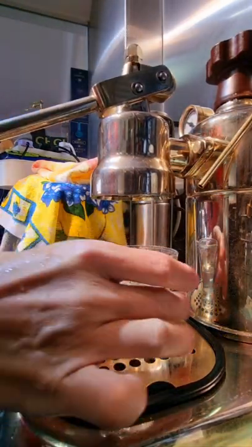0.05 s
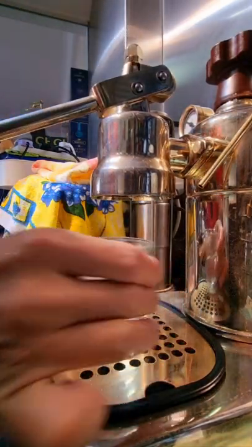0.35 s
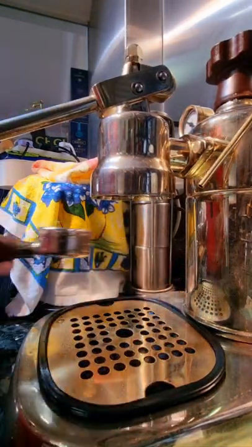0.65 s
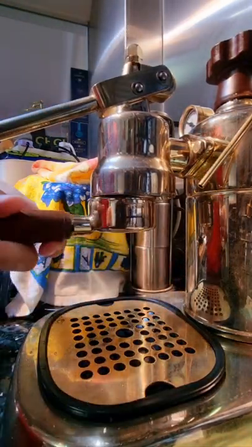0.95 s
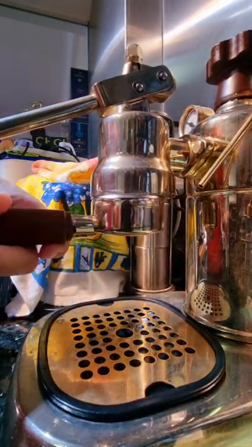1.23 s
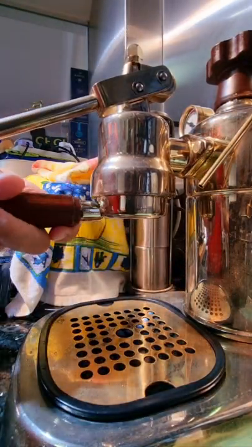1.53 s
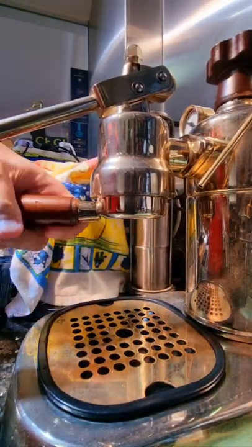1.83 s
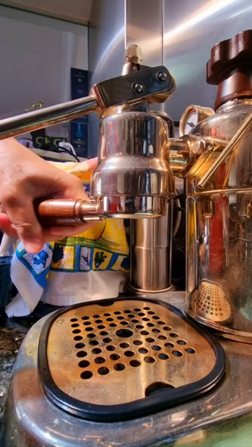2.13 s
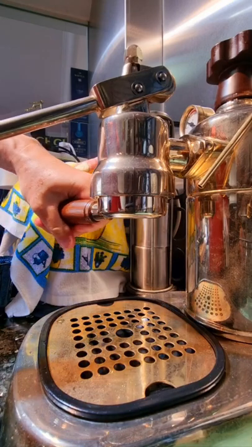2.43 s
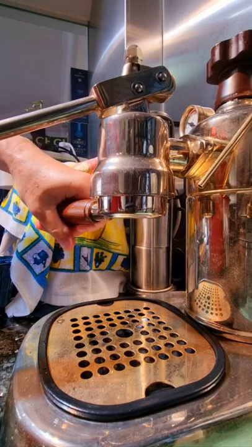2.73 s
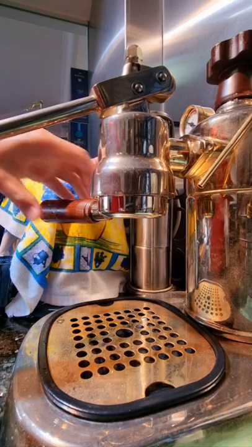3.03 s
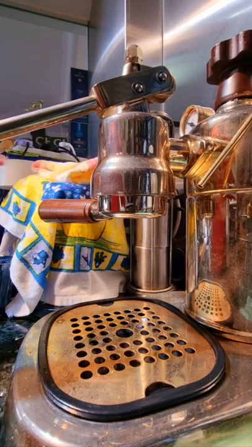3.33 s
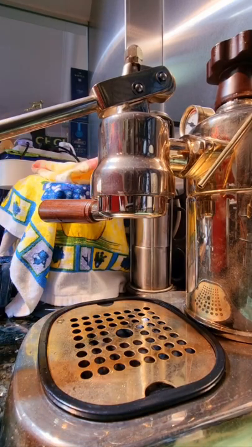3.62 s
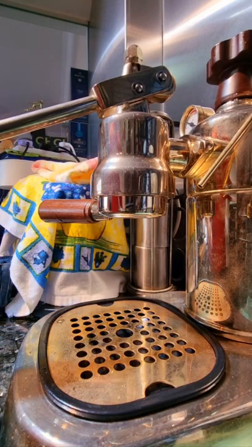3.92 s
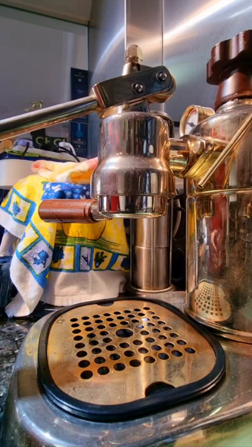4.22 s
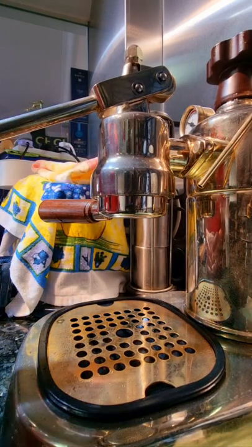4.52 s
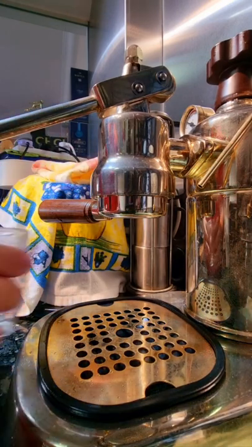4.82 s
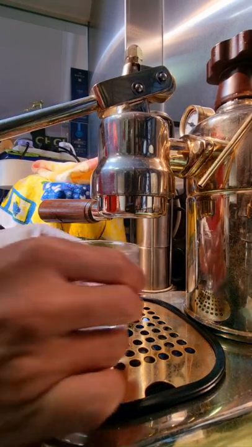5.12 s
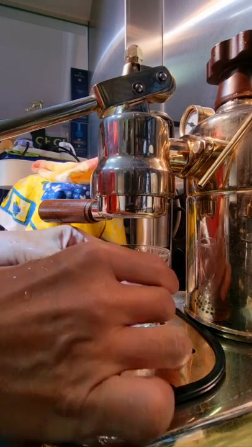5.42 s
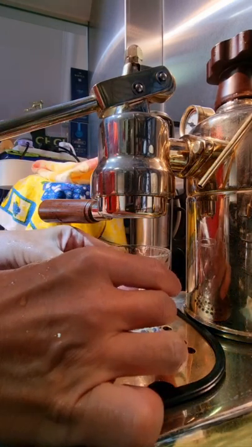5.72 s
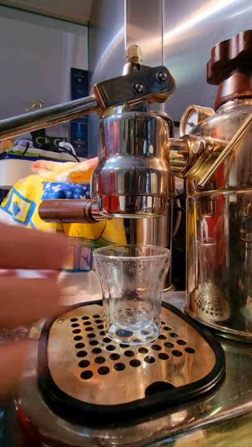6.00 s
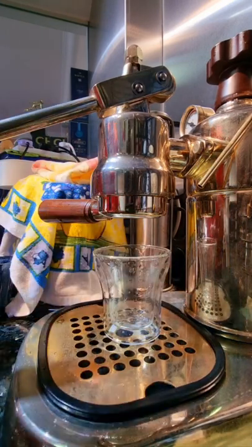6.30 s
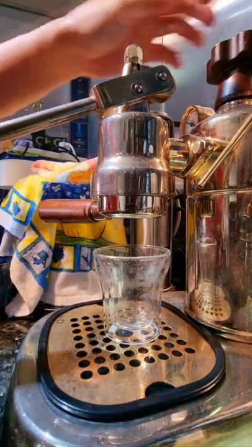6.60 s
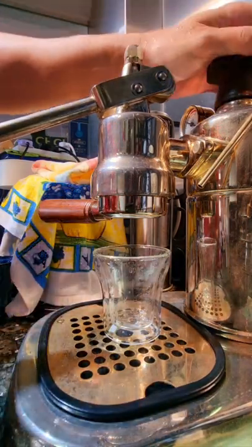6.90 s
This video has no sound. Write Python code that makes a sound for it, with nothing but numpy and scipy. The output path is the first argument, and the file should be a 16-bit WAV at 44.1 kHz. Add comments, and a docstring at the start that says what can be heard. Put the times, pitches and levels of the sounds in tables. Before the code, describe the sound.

Close by, a metal filter holder knocks against an espresso machine, slides into its groove with a short scrape and clacks home. After faint rubbery rubbing come some dull thuds and bright ticks, then a pause. Light clinks lead into a small glass landing on the metal drip tray in two quick rattles, followed by a soft knock and scattered little pings. A low kitchen hum and a barely audible boiler whistle lie underneath.

```python
"""Lever espresso machine and glass

A brass filter holder clacks into the group, scrapes round and is twisted tight on its rubber gasket.
Then a small glass rattles down on the metal drip tray, among light pings, faint ticks and low thuds.
Behind it all, a quiet kitchen hums and the hot boiler gives a thin whistle."""
import sys
import numpy as np
from scipy import signal
from scipy.fft import rfft, irfft
from scipy.io import wavfile

SR = 44100
rng = np.random.default_rng(int(sys.argv[2]) if len(sys.argv) > 2 else 0)


def wrap_up_sound(samples):
    """Save the sound to the file named by the first command line argument, as 16-bit audio."""
    columns = np.atleast_2d(samples).T
    # keep every value between -1 and 1, then stretch to whole-number steps
    tamed = np.clip(columns, -1, 1)
    steps = np.round(tamed * 32767).astype(np.int16)
    wavfile.write(sys.argv[1], SR, steps)


N = 306495
HIT_SIZE = 2 ** 14   # samples in one hit
CLACK_FALL_S, THUD_RISE_S = 0.0115, 0.012
PING_RISE_S, PING_FALL_S = 0.0055, 0.0081

# a faint, dull knock, then the holder's clacks:
# start_s, level_db, rise_s, tilt_db_per_octave, seated (0 loose, 1 home)
KNOCK_AND_CLACKS = [(0.416, -54, 0.0035, -6, 0), (1.191, -24, 0.004, 1, 0), (1.204, -24, 0.0034, 1.5, 0),
                    (1.592, -32.5, 0.0099, 0, 1), (1.619, -18, 0.0059, -0.5, 1), (1.65, -33, 0.0035, 3, 1),
                    (1.749, -51.5, 0.0096, -0.5, 1)]
# low thuds from the machine, counter and tray: start_s, level_db, pitch_hz, fall_s
LOW_THUDS = [(0.437, -57, 245.6, 0.016), (1.214, -43.5, 326.4, 0.022), (1.415, -41.5, 252.8, 0.056),
             (1.664, -28, 258, 0.017), (1.735, -47, 155, .035), (2.544, -49, 248, 0.0096),
             (2.663, -53, 261.8, .03), (2.808, -56, 139.5, 0.057), (3.276, -53, 222, 0.0095),
             (3.41, -58.5, 269, 0.036), (3.51, -37.5, 200.7, 0.016), (3.563, -48, 205.5, 0.05),
             (3.624, -54, 187, 0.014), (3.735, -56, 204, 0.01), (5.503, -47, 250, 0.012),
             (5.639, -50, 262.4, 0.019), (6.14, -56, 140.5, 0.044), (6.66, -59, 140, .03)]
# brass lugs sliding in their groove: time_s, level_db
LUG_SLIDE = [(1.29, -81), (1.33, -55.5), (1.375, -38.5), (1.41, -37.5), (1.445, -44.5), (1.472, -45),
             (1.51, -65.5), (1.55, -84)]
# gasket rubbing as the holder is tightened in short pulls: time_s, level_db
GASKET_PULLS = [(1.78, -79), (2.0, -86), (2.23, -78.5), (2.28, -71), (2.345, -79), (2.38, -68),
                (2.5, -71.5), (2.55, -69.5), (2.585, -77), (2.615, -73.5), (2.675, -69.5), (2.705, -89),
                (2.78, -97)]
# broad tone colour of brass: freq_hz, level_db
BRASS_COLOUR = [(80, -21), (200, -17.5), (330, 1), (430, -10.5), (600, -5), (1000, -7.5), (1500, -5.5),
                (2400, -4.5), (3300, -2.5), (4500, -3), (6400, -8), (8000, -22), (11000, -23.5),
                (15500, -33)]
# the group's treble leans right: freq_hz, left_over_right_db
HOLDER_PAN = [(300, 0), (2000, 0.5), (4500, -5), (12000, -2)]
# phase between the channels: freq_hz, left_lead_rad
STEREO_PHASE = [(100, -6), (550, -1.5), (1100, -1.5), (4000, -2)]


def from_db(db):
    """Decibels to gain."""
    return 10 ** (np.asarray(db) / 20)


def rms_one(x):
    """Scale each channel to rms 1."""
    return x / np.sqrt(np.mean(x ** 2, axis=-1, keepdims=True) + 1e-30)


def bins(size):
    """Frequencies of a spectrum, kept above zero."""
    return np.maximum(np.fft.rfftfreq(size, 1 / SR), 1)


def at_hz(points, hz):
    """Read a table on a log-frequency axis."""
    freq_hz, value = np.transpose(points)
    return np.interp(np.log(hz), np.log(freq_hz), value)


def level_curve(rows):
    """Gain envelope from rows of time_s, level_db; silent outside them."""
    time_s, level_db = np.transpose(rows)
    return from_db(np.interp(np.arange(N) / SR, time_s, level_db, left=-np.inf, right=-np.inf))


def through(x, response):
    """Filter by a frequency response."""
    return irfft(rfft(x) * response, x.shape[-1])


def drift(rate_hz, size):
    """Smooth random wander of rms 1, mostly slower than rate_hz."""
    return rms_one(through(rng.standard_normal(size), 1 / (1 + (bins(size) / rate_hz) ** 2)))


def panned(x, balance):
    """Pan each frequency at constant power."""
    ratio = from_db(at_hz(balance, bins(x.shape[-1])))
    return through(x, np.array([ratio, np.ones_like(ratio)]) * np.sqrt(2 / (1 + ratio ** 2)))


def add(out, start_s, level_db, hit):
    """Mix a hit in so that its envelope peaks at start_s."""
    first = round(start_s * SR) - HIT_SIZE // 4
    out[:, first:first + HIT_SIZE] += from_db(level_db) * hit[:, :N - first]


def resonance(hz, centre_hz, width_hz):
    """Response of one damped mode, 1 at its peak."""
    return 1 / (1 + 1j * (hz ** 2 - centre_hz ** 2) / (hz * width_hz))


def body(hz, colour, modes=()):
    """Response of an object: a broad colour with ringing modes standing out of it."""
    response = from_db(at_hz(colour, hz)) + 0j
    for centre_hz, width_hz, boost_db in modes:
        response = response * (1 + (from_db(boost_db) - 1) * resonance(hz, centre_hz, width_hz))
    return response / np.sqrt(np.mean(abs(response) ** 2))


def ripple(hz, depth_db, spacing_hz):
    """Many small close modes: each draw favours some and misses others."""
    grid = np.arange(0, SR / 2, spacing_hz)
    heights = rng.standard_normal(2048)[:len(grid)].clip(-1.6, 1.6)
    return from_db(depth_db * np.interp(hz, grid, heights))


def grains(size, rough_db, rate_hz=400):
    """Dense, grainy noise in uneven clumps, partly alike left and right."""
    # likeness of the channels: freq_hz, coherence (0 to 1)
    likeness = [(60, 0.32), (500, 1), (1100, 0.3), (2500, 0.27), (12000, .1)]
    hz = bins(size)
    left, other = rfft(rng.standard_normal((2, size)))
    alike = at_hz(likeness, hz)
    right = alike * np.exp(-1j * at_hz(STEREO_PHASE, hz)) * left + np.sqrt(1 - alike ** 2) * other
    clumps = from_db(rough_db * drift(rate_hz, size))
    return rms_one(irfft(np.array([left, right]), size) * clumps)


def swell(rise_s, fall_s):
    """Loudness envelope of a hit: a soft rise, a peak a quarter of the way in, then a decay."""
    t = (np.arange(HIT_SIZE) - HIT_SIZE // 4) / SR
    return np.exp(-np.maximum(-t / rise_s, t / fall_s))


def with_energy_of(envelope, x):
    """Give a sound the energy of its envelope."""
    return rms_one(x) * np.sqrt(np.mean(envelope ** 2))


def chatter(envelope, response, rough_db):
    """A burst of grainy noise rings an object."""
    return with_energy_of(envelope, through(envelope * grains(HIT_SIZE, rough_db), response))


def struck(envelope, response, modes, rough_db, clean_share):
    """Chatter plus one clean blow, which rings the main modes with its share of the energy."""
    t = np.maximum(np.arange(HIT_SIZE) - HIT_SIZE // 4 + .005 * SR, 0) / SR   # from 5 ms before the peak
    hz, ring = bins(HIT_SIZE), 0
    for centre_hz, width_hz, _ in modes:
        height = np.interp(centre_hz, hz, abs(response)) * width_hz
        phase = 2 * np.pi * (centre_hz * t + rng.random((2, 1)))
        ring = ring + height * np.exp(-np.pi * width_hz * t) * np.sin(phase)
    attack = np.tanh(t / 0.0032) ** 2
    blow = with_energy_of(envelope, ring * attack)
    return np.sqrt(1 - clean_share) * chatter(envelope, response, rough_db) + np.sqrt(clean_share) * blow


def ping(envelope, centre_hz, width_hz, pure_hz=30, skirt_db=-33):
    """A brief ring in one band; the narrower the band, the purer the tone."""
    hz, t = bins(HIT_SIZE), np.arange(HIT_SIZE) / SR
    tone = (pure_hz / width_hz) * np.sin(2 * np.pi * centre_hz * t - np.array([[0], [np.pi / 2]]))
    band = np.exp(-.5 * ((hz - centre_hz) / width_hz) ** 2)
    skirt = from_db(skirt_db) * np.exp(-2 * np.log2(hz / centre_hz) ** 2)
    drive = envelope * (tone + grains(HIT_SIZE, rough_db=2.5))
    return with_energy_of(envelope, through(drive, band + skirt))


def rubbed(friction, response, shift_hz, patchy_db, spots=4):
    """The grip keeps shifting between a few spots, each with its own small modes."""
    grips = np.exp([2 * drift(shift_hz, N) for _ in range(spots)])
    return sum(through(friction * share, response * ripple(bins(N), patchy_db, spacing_hz=78.7))
               for share in grips / grips.sum(axis=0))


def lingering(drive, fall_s):
    """Energy fed into a body whose swing dies away over fall_s."""
    keep = np.exp(-2 / (fall_s * SR))
    return signal.lfilter([1 - keep], [1, -keep], drive ** 2 + 1e-18)


def kitchen_hum(gain_db=-62.5):
    """A steady, dark hum from all around: noise with a few low resonances."""
    # kitchen tone: freq_hz, level_db
    colour = [(25, -12.5), (48, -4.5), (70, 1.5), (125, 2.5), (160, -12), (300, -12.5), (620, -16),
              (1150, -7.5), (1500, -17.5), (2200, -22), (3100, -22.5), (4200, -26), (7500, -34),
              (11000, -32.5), (15500, -34)]
    # hum resonances: pitch_hz, width_hz, boost_db
    modes = [(139.8, 71, 7.2), (316, 15, 10), (455, 56.7, 18.34), (827, 55, 11)]
    return from_db(gain_db) * through(rng.standard_normal((2, N)), body(bins(N), colour, modes))


def boiler_whistle(pitch_hz=6570, width_hz=60):
    """The hot boiler whistles in one thin band of noise."""
    # an early swell, then a long fade: time_s, level_db
    envelope = [(0, -95), (.7, -89.5), (1.2, -92.5), (7, -103)]
    steam = rng.standard_normal((2, N))
    whistle = rms_one(through(steam, resonance(bins(N), pitch_hz, width_hz) ** 2))
    return level_curve(envelope) * whistle


def room(x, build_s=0.0074, size=32768):
    """Diffuse kitchen reflections, each octave dying away at its own rate."""
    # reverb time: freq_hz, t60_s
    decay_times = [(150, 0.55), (600, 0.16), (2500, 0.33), (5000, 0.18), (12000, 0.29)]
    t, hz = np.arange(size) / SR, bins(size)
    noise, tail = rng.standard_normal((2, size)), 0
    for centre_hz in np.geomspace(62.5, 16000, 9):
        octave = np.maximum(1 - abs(np.log2(hz / centre_hz)), 0)
        tail = tail + through(noise, octave) * np.exp(-np.log(1000) * t / at_hz(decay_times, centre_hz))
    tail = rms_one(tail * (1 - np.exp(-t / build_s))) / np.sqrt(size)
    return signal.fftconvolve(x, tail, axes=1)[:, :N]


def frame_rumble(clack_db=-17.5, thud_db=-9.5, slide_db=-16, twist_db=15.5):
    """Clacks, thuds, the sliding lugs and the twisting hand shake the frame, which rumbles on briefly."""
    # frame tone: freq_hz, level_db
    colour = [(50, -18.5), (110, -2), (165, -5.5), (235, 1.5), (310, 0.5), (400, -13.5), (800, -30.5),
              (2000, -70.5)]
    # frame resonance: pitch_hz, width_hz, boost_db
    modes = [(320, 70, 11)]
    blows = np.zeros((1, N))
    for start_s, level_db, rise_s, *_ in KNOCK_AND_CLACKS:
        add(blows, start_s, level_db + clack_db, swell(rise_s, CLACK_FALL_S)[None])
    for start_s, level_db, _, fall_s in LOW_THUDS:
        add(blows, start_s, level_db + thud_db, swell(THUD_RISE_S, fall_s)[None])
    pushes = blows[0] + from_db(slide_db) * level_curve(LUG_SLIDE)
    twist = from_db(twist_db) * level_curve(GASKET_PULLS)
    energy = lingering(pushes, fall_s=0.012) + lingering(twist, fall_s=0.037)   # the hand lets go slowly
    return through(np.sqrt(energy) * grains(N, rough_db=2.0, rate_hz=25), body(bins(N), colour, modes))


def low_thuds(sag_share=0.18, sag_s=0.025, wobble_db=3):
    """Low thuds from the machine, counter and tray: a few sinking, wavering cycles each."""
    # faint modes that ring with every thud: pitch_hz, relative_db, fall_s
    side_modes = [(81.2, -26, .07), (563, -22.5, .04), (840, -16, 0.016)]
    out, t = np.zeros((2, N)), (np.arange(HIT_SIZE) - HIT_SIZE // 4) / SR
    sinking = 1 - sag_share * np.tanh(t / sag_s)
    for start_s, level_db, pitch_hz, swing_fall_s in LOW_THUDS:
        for hz, mode_db, fall_s in [(pitch_hz * sinking, 0, swing_fall_s), *side_modes]:
            phase = 2 * np.pi * (np.cumsum(hz * np.ones(HIT_SIZE)) / SR + rng.random())
            tone = np.sqrt(2) * np.sin([phase, phase - at_hz(STEREO_PHASE, hz)])
            envelope = swell(THUD_RISE_S, fall_s) * from_db(wobble_db * drift(50, HIT_SIZE))
            add(out, start_s, level_db + mode_db, envelope * tone)
    return out


def faint_ticks(count=56, start_s=5.15, end_s=6.84, loudest_db=-64.5, spread_db=13):
    """Faint uneven ticks, perhaps the hot boiler ticking, each with its own strength and colour."""
    # tick tone: freq_hz, level_db
    colour = [(1000, -12), (1700, 2), (2400, -9), (3200, -4.5), (4400, -10), (5500, -39), (12000, -60)]
    # tick resonances: pitch_hz, width_hz, boost_db
    modes = [(1800, 86, 10.6), (2230, 89, 24), (4320, 120, 6.6)]
    out, hz = np.zeros((2, N)), bins(HIT_SIZE)
    metal, envelope = body(hz, colour, modes), swell(PING_RISE_S, PING_FALL_S)
    for slot, (late, faintness) in enumerate(rng.random((count, 2))):
        time_s = np.interp(slot + late, [0, count], [start_s, end_s])
        response = metal * ripple(hz, depth_db=10.0, spacing_hz=228)
        add(out, time_s, loudest_db - spread_db * faintness, chatter(envelope, response, rough_db=2.5))
    return out


def metal_ticks(gain_db=-2.5, rise_s=0.0054, crack_lead_s=0.013, width_share=0.16):
    """A treble crack, then a short ring of the metal's modes around one pitch."""
    # sharp ticks: start_s, ring_db, pitch_hz, fall_s, crack_db
    ticks = [(3.364, -67.5, 5940, 0.064, -67.5), (3.41, -65.5, 5570, .022, -71),
             (3.508, -43, 4800, 0.0077, -50), (3.543, -38, 4300, 0.0075, -71),
             (6.361, -65.5, 4806, 0.013, -97)]
    # high brass resonances: pitch_hz, width_hz, boost_db
    modes = [(3730, 41, 8.9), (4386, 53, 8.6), (4730, 48, 2.9), (4960, 97, 8.1), (6380, 150, 16)]
    out, hz = np.zeros((2, N)), bins(HIT_SIZE)
    metal = body(hz, BRASS_COLOUR, modes)
    for start_s, ring_db, pitch_hz, fall_s, crack_db in ticks:
        crack = ping(swell(rise_s, fall_s=0.028), centre_hz=12100, width_hz=8500)
        focus = np.exp(-.5 * (np.log(hz / pitch_hz) / width_share) ** 2)
        ring = chatter(swell(rise_s, fall_s), metal * focus, rough_db=1.5)
        add(out, start_s - crack_lead_s, crack_db + gain_db, crack)
        add(out, start_s, ring_db + gain_db, ring)
    return out


def light_pings(gain_db=6.5, overtone_ratio=1.9, overtone_db=-32):
    """Light, narrow pings, each with a faint overtone."""
    # pings: start_s, level_db, pitch_hz, width_hz
    pings = [(1.303, -43.5, 2070, 133), (1.878, -65, 2780, 220), (3.356, -66.5, 3470, 452),
             (3.402, -55.5, 3165, 111), (3.416, -58.5, 3166, 150), (5.003, -55, 3904, 170),
             (5.04, -78, 10050, 200), (5.086, -60, 2200, 119), (5.183, -57.5, 2080, 130),
             (5.201, -54.5, 2140, 111), (5.257, -55.5, 1880, 99.5), (5.258, -53.5, 3300, 270),
             (5.262, -47, 2140, 116), (5.753, -63.5, 2050, 450), (5.864, -55, 2230, 100),
             (5.9, -56.5, 2275, 100), (6.009, -61.5, 1820, 80), (6.011, -60, 2210, 90),
             (6.138, -51.5, 2212, 119.5), (6.139, -58, 1810, 141), (6.172, -64.5, 1800, 140),
             (6.247, -62, 2197, 90), (6.466, -50.5, 2210, 100), (6.671, -63.5, 2265, 101)]
    out, envelope = np.zeros((2, N)), swell(PING_RISE_S, PING_FALL_S)
    for start_s, level_db, pitch_hz, width_hz in pings:
        overtone = from_db(overtone_db) * ping(envelope, overtone_ratio * pitch_hz, width_hz)
        add(out, start_s, level_db + gain_db, ping(envelope, pitch_hz, width_hz) + overtone)
    return out


def plate_knocks(gain_db=-0.5):
    """Soft knocks ring the tray plate alone."""
    # knocks on the plate: start_s, level_db
    knocks = [(5.179, -42.5), (5.903, -32.5)]
    # plate tone: freq_hz, level_db
    colour = [(100, -21), (350, -6), (650, -7), (900, 5), (1250, 7.5), (1600, -5.5), (2400, -28),
              (3200, -17), (5000, -38), (12000, -53)]
    # plate resonances: pitch_hz, width_hz, boost_db
    modes = [(547, 13.6, 22.6), (831, 24, 13.5), (934, 32, 12), (1205, 20.8, 15.5), (1820, 55, 16),
             (2250, 50, 26.4), (4180, 50, 25.6)]
    out, plate = np.zeros((2, N)), body(bins(HIT_SIZE), colour, modes)
    envelope = swell(rise_s=0.0093, fall_s=0.01)
    for start_s, level_db in knocks:
        knock = struck(envelope, plate, modes, rough_db=1.5, clean_share=0.28)
        add(out, start_s, level_db + gain_db, knock)
    return out


def glass_on_tray(gain_db=-0.5):
    """The glass rattles down on the tray, ringing one way on its edge and another once it sits flat."""
    # glass meeting the tray: start_s, level_db, rise_s, fall_s, cutoff_hz, seated (0 on edge, 1 flat)
    landings = [(5.493, -35.5, 0.007, 0.0097, 11500, 0), (5.502, -30, 0.0065, 0.017, 9000, 0),
                (5.517, -41, 0.0022, 0.015, 8000, 0), (5.539, -40.5, 0.0026, 0.0076, 6000, 0),
                (5.632, -27, 0.0055, 0.0068, 13000, 1), (5.639, -27.5, 0.0026, 0.0077, 11000, 1)]
    # tray tone: freq_hz, level_db
    colour = [(80, -14), (170, -5), (250, 1), (400, -8.5), (750, -11.5), (1100, -2.5), (1700, -8.5),
              (3000, -1), (6300, -5.5), (7800, -14.5), (11000, -14.5), (15500, -23)]
    # resonances with the glass on its edge: pitch_hz, width_hz, boost_db
    edge_modes = [(514, 34, 23.7), (1066, 60, 17.8), (1386, 24.5, 26.1), (1670, 50, 11), (2200, 70, 16),
                  (2880, 45, 17.2), (6480, 240, 8.2)]
    # resonances with the glass flat: pitch_hz, width_hz, boost_db
    flat_modes = [(335, 24, 12.5), (493, 17, 17), (1072, 38, 14.8), (1296, 55, 18.7), (1436, 36, 10),
                  (1970, 66, 14.3), (2340, 38, 12.2), (2580, 36, 8.4), (2933, 57, 11.2), (4640, 28, 5.3),
                  (6430, 180, 8.9)]
    out, hz = np.zeros((2, N)), bins(HIT_SIZE)
    for start_s, level_db, rise_s, fall_s, cutoff_hz, seated in landings:
        modes = flat_modes if seated else edge_modes
        tray = body(hz, colour, modes) * ripple(hz, depth_db=2.5, spacing_hz=89.9)
        softness = 1 / np.sqrt(1 + (hz / cutoff_hz) ** 6)
        hit = struck(swell(rise_s, fall_s), tray * softness, modes, rough_db=2.0, clean_share=0.42)
        add(out, start_s, level_db + gain_db, hit)
    return out


def lug_scrape(gain_db=2.0):
    """The brass lugs catch and slip round the groove, ringing it briefly."""
    # scrape tone: freq_hz, level_db
    colour = [(100, -23), (300, -1), (430, -14), (700, -5.5), (1050, 7.5), (1450, -0.5), (3800, -0.5),
              (6300, -8), (7500, -23.5), (15500, -35)]
    # groove resonances: pitch_hz, width_hz, boost_db
    modes = [(554, 39, 10), (700, 45, 8.5), (1510, 40, 7), (2277, 60, 10.5), (3500, 120, 2)]
    friction = level_curve(LUG_SLIDE) * grains(N, rough_db=3, rate_hz=330)
    scrape = rubbed(friction, body(bins(N), colour, modes), shift_hz=14, patchy_db=6.5)
    return from_db(gain_db) * scrape


def gasket_rub(rub_db=2.0, squeak_db=4.5, squeak_hz=3640, tight_s=2.44, build_s=0.08, shift_hz=14):
    """The rubber gasket rubs with each pull; once tight it squeaks, wandering as the grip shifts."""
    # rubber tone: freq_hz, level_db
    colour = [(300, -5), (800, 2.5), (1300, 2.5), (2000, -5.5), (2600, 0.5), (3900, 3), (4700, -7.5),
              (6400, -5.5), (7500, -21.5), (15500, -32)]
    pulls = level_curve(GASKET_PULLS)
    friction = pulls * grains(N, rough_db=0.0)
    rub = rubbed(friction, body(bins(N), colour), shift_hz, patchy_db=8.5)
    tight = np.clip((np.arange(N) / SR - tight_s) / build_s, 0, 1)
    pitch_hz = squeak_hz * (1 + 0.05 * drift(shift_hz, N))
    flutter = np.array([drift(rate_hz=200, size=N) for channel in range(2)])
    squeak = pulls * tight * flutter * np.sin(2 * np.pi * np.cumsum(pitch_hz) / SR)
    return from_db(rub_db) * rub + from_db(squeak_db) * squeak


def knock_and_clacks():
    """A faint, dull knock, then the holder's brass clacks, ringing differently loose and pressed home."""
    # resonances of the loose holder: pitch_hz, width_hz, boost_db
    loose_modes = [(693, 57, 7), (1090, 48, 14), (1206, 40, 5), (1912, 56, 7.5), (2140, 17, 4.5),
                   (2890, 55, 11), (3470, 64, 7), (4190, 40, 6.5)]
    # resonances of the holder pressed home: pitch_hz, width_hz, boost_db
    home_modes = [(550, 70, 2), (661, 46, 8), (864.3, 40, 10), (1174, 55, 17), (2126, 34, 9.5),
                  (2805, 80, 3.5), (2970, 35, 7.5), (3050, 46, 6.5), (3270, 65, 7), (3505, 80, 11),
                  (10400, 400, 3.5)]
    out, hz = np.zeros((2, N)), bins(HIT_SIZE)
    for start_s, level_db, rise_s, tilt_db_per_octave, seated in KNOCK_AND_CLACKS:
        modes = home_modes if seated else loose_modes
        tilt = from_db(tilt_db_per_octave * np.log2(hz))
        brass = body(hz, BRASS_COLOUR, modes) * tilt * ripple(hz, depth_db=4.0, spacing_hz=70.8)
        hit = struck(swell(rise_s, CLACK_FALL_S), brass, modes, rough_db=-2.0, clean_share=0.13)
        add(out, start_s, level_db, hit)
    return out


def scene(room_db=-14.5, ping_room_db=-15.0):
    """Machine, thuds, glass, pings and ticks share the kitchen's reverb, over the hum and whistle."""
    # the tray lies lower and further right than the group: freq_hz, left_over_right_db
    tray_pan = [(300, -1.5), (1200, 2), (3000, -4), (8000, -2.5)]
    # the treble of the pings and ticks leans left: freq_hz, left_over_right_db
    ping_pan = [(2100, -3), (3500, 1), (10000, 3.5)]
    # the whole mix leans left, most in the bass: freq_hz, left_over_right_db
    mix_pan = [(30, 4.5), (130, 17), (280, 17), (550, 7.5), (1100, 7), (2200, 10), (4200, 7.5), (8000, 3),
               (14000, -0.5)]
    holder = panned(knock_and_clacks() + lug_scrape(), HOLDER_PAN) + gasket_rub()
    lows = frame_rumble() + low_thuds()
    tray = panned(glass_on_tray() + plate_knocks(), tray_pan)
    handling = holder + lows + tray
    pings = panned(light_pings() + metal_ticks() + faint_ticks(), ping_pan)
    reflections = room(from_db(room_db) * handling + from_db(ping_room_db) * pings)
    background = kitchen_hum() + boiler_whistle()
    return panned(handling + pings + reflections + background, mix_pan)


def record(dry, cutoff_hz=15750):
    """A steep low-pass takes off the very top."""
    return signal.sosfilt(signal.ellip(12, .1, 80, cutoff_hz, fs=SR, output="sos"), dry)


dry = scene()
out = record(dry)
wrap_up_sound(out)
```